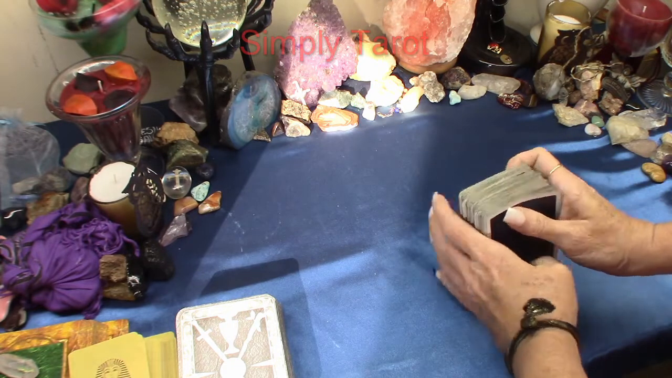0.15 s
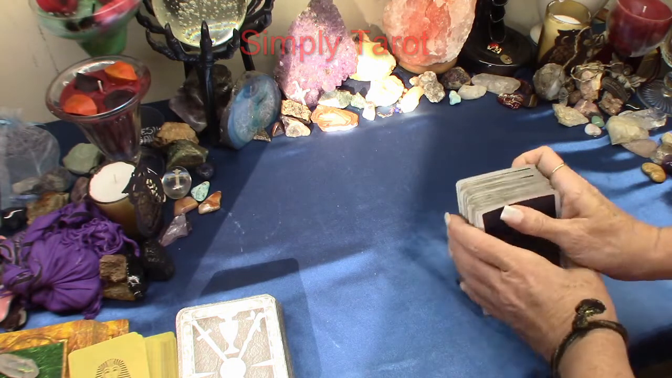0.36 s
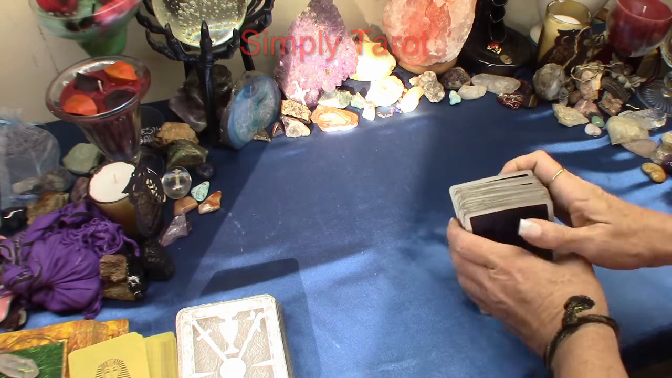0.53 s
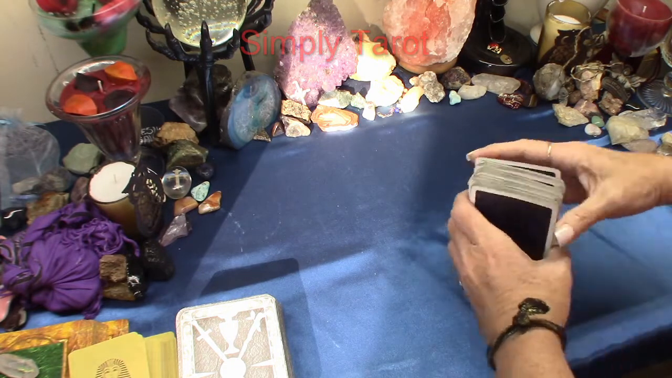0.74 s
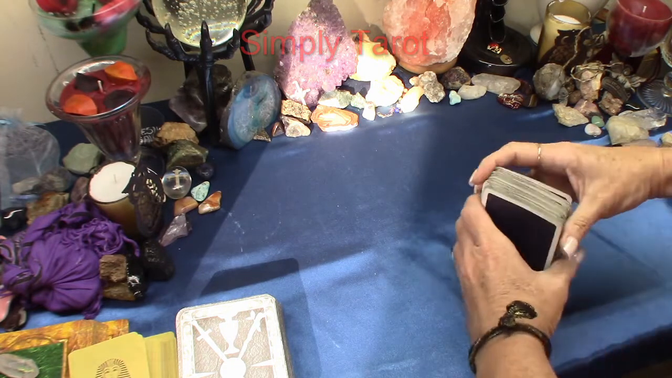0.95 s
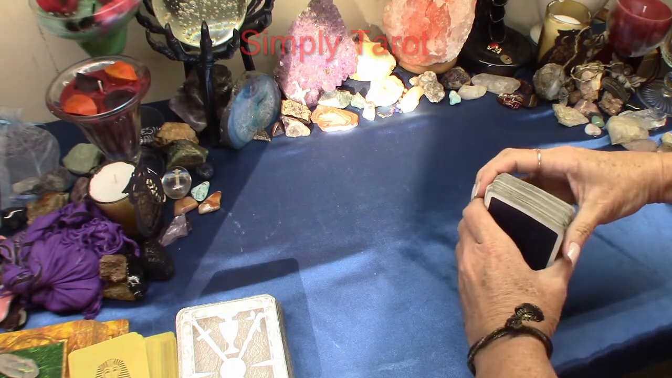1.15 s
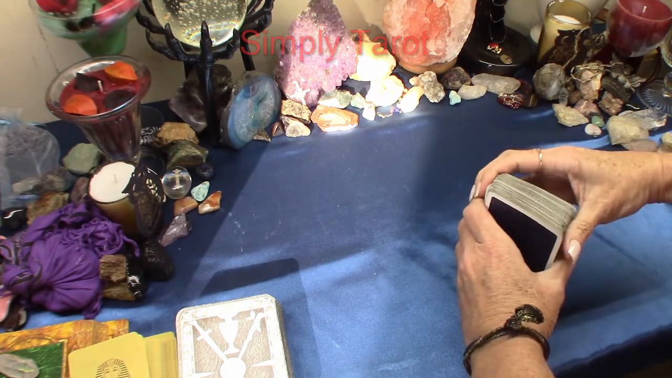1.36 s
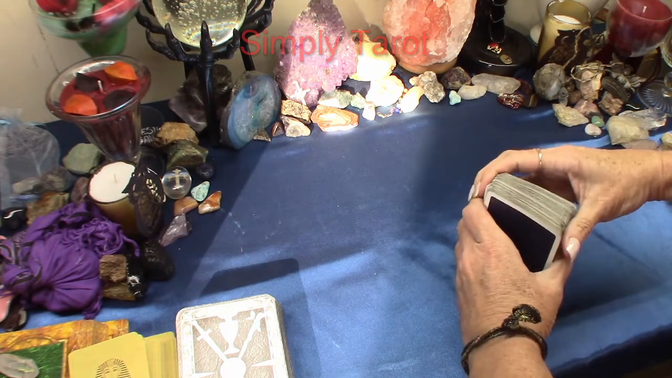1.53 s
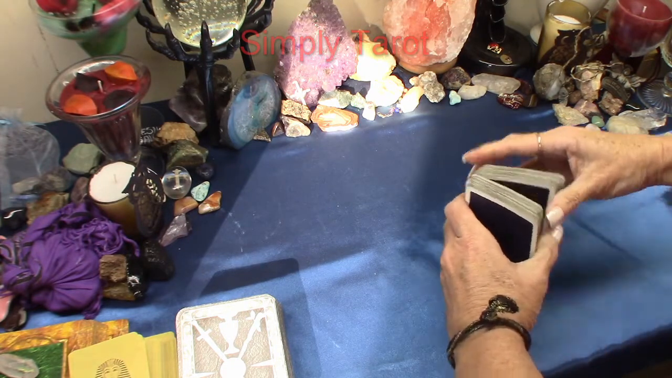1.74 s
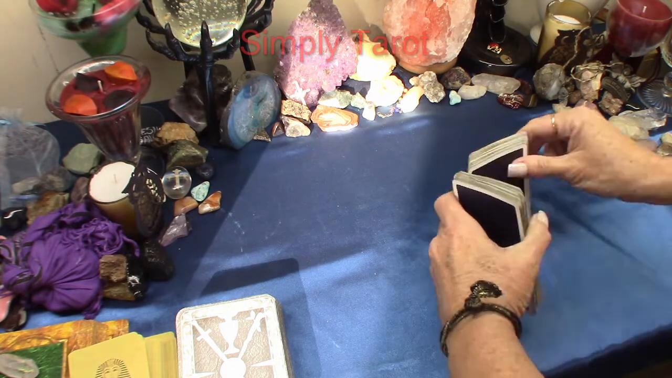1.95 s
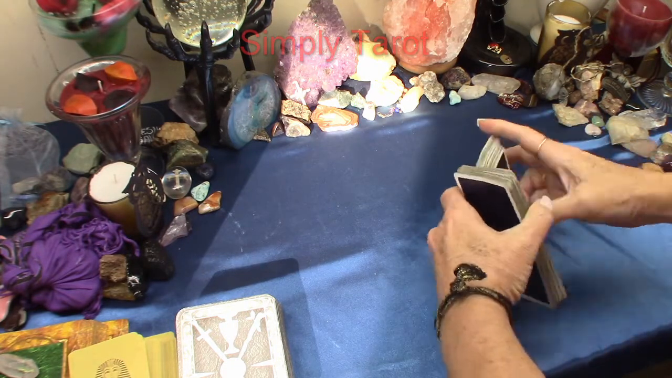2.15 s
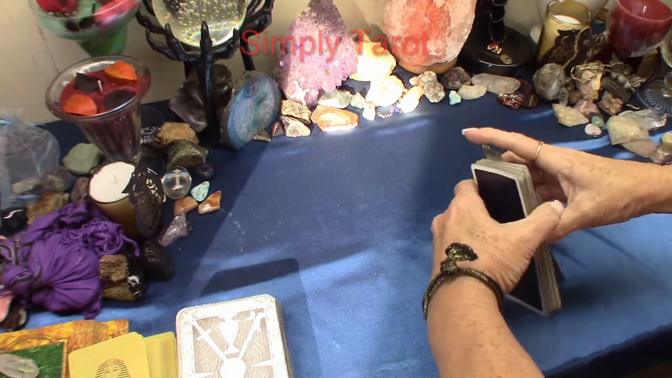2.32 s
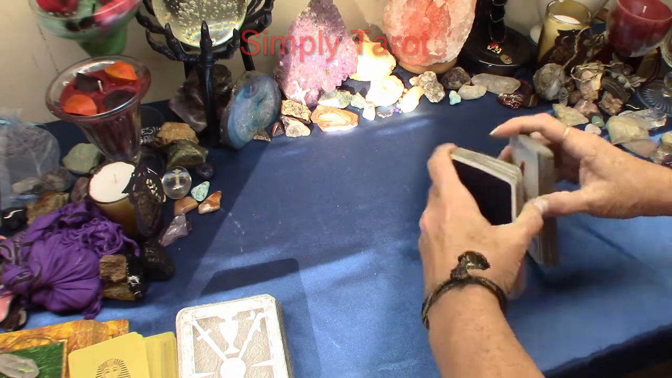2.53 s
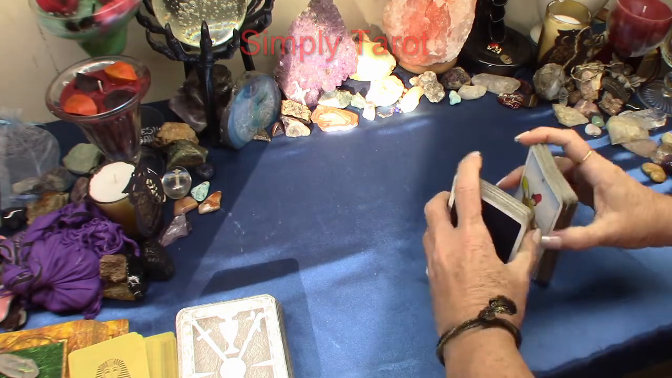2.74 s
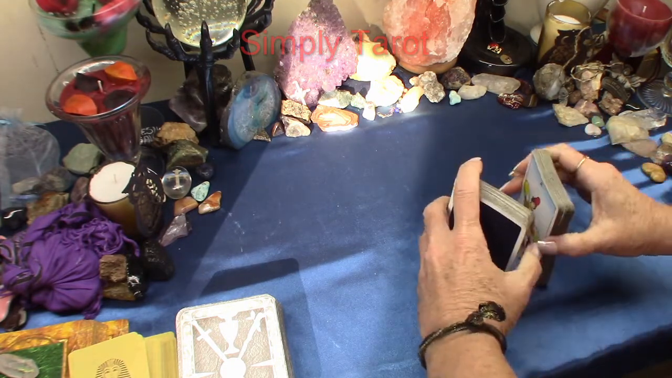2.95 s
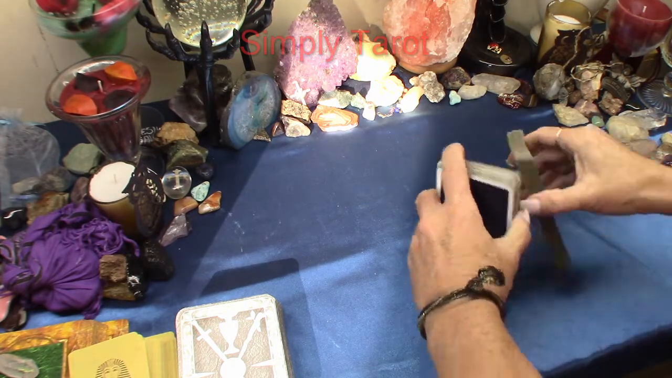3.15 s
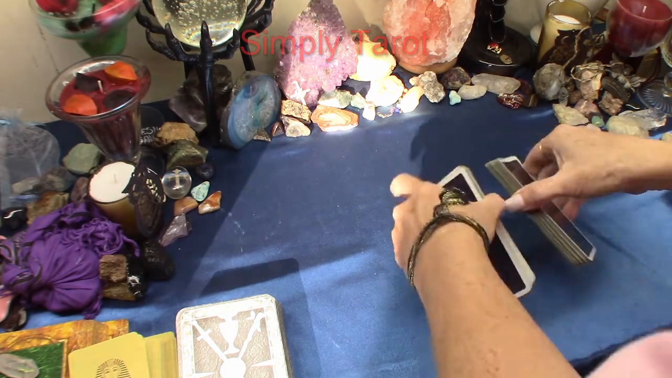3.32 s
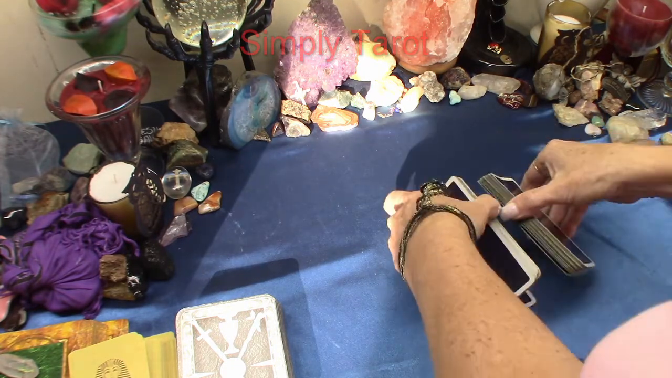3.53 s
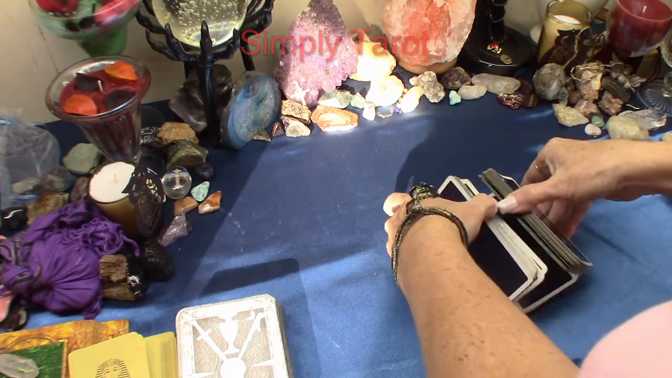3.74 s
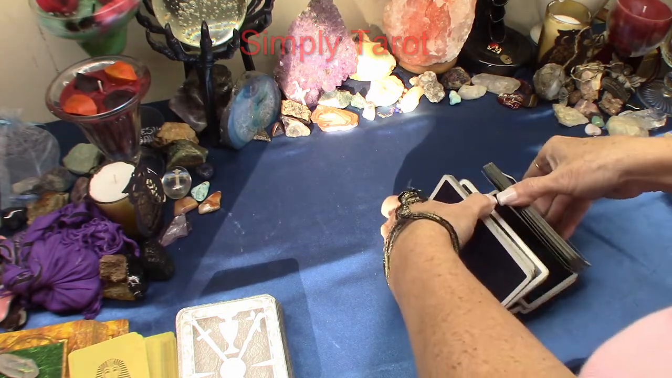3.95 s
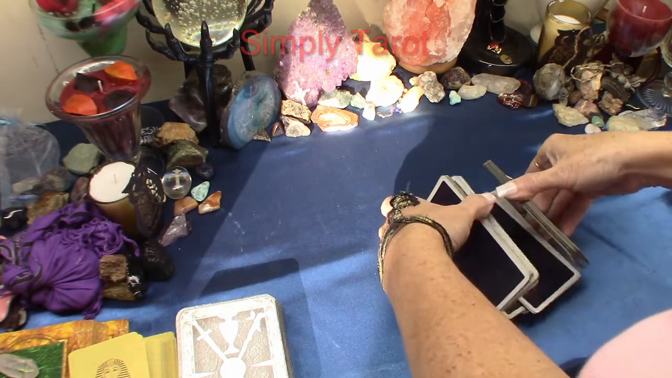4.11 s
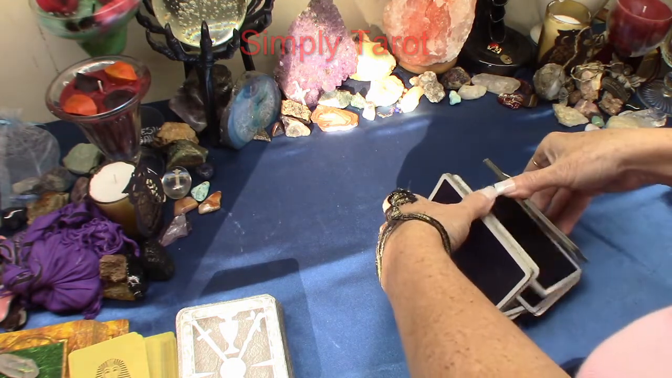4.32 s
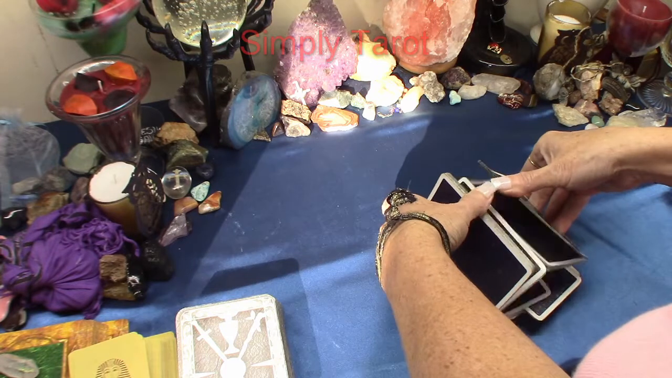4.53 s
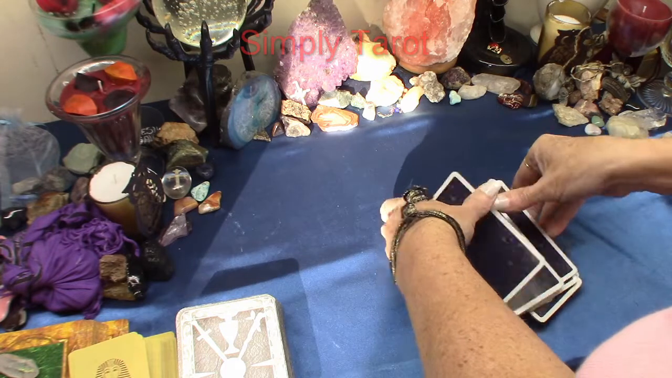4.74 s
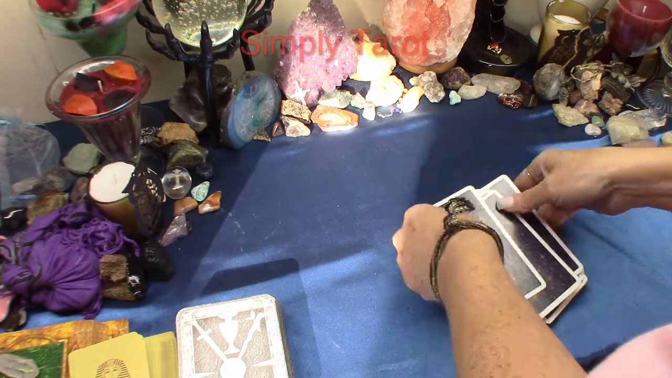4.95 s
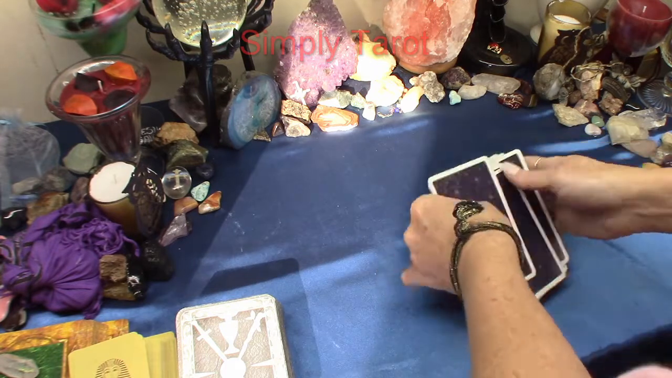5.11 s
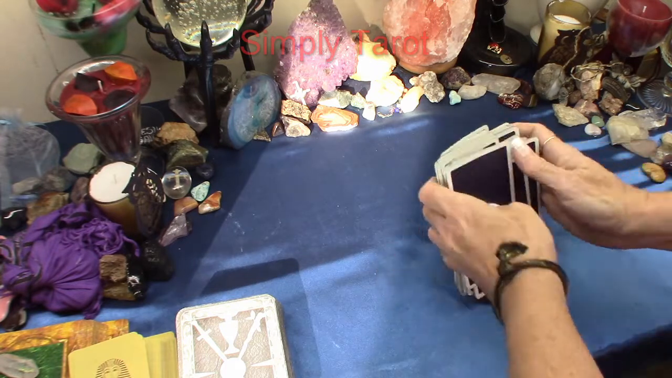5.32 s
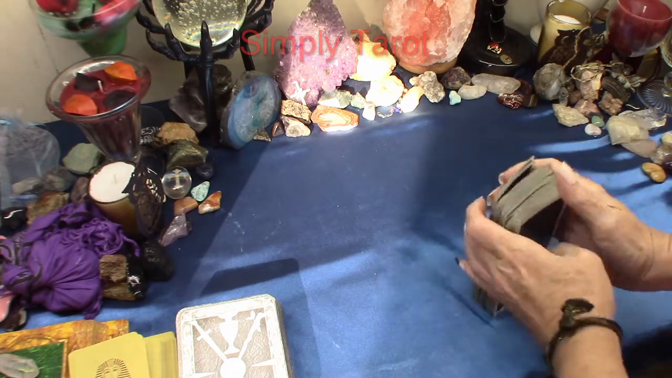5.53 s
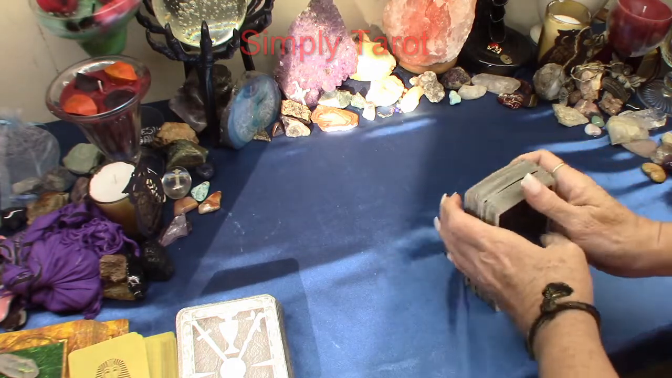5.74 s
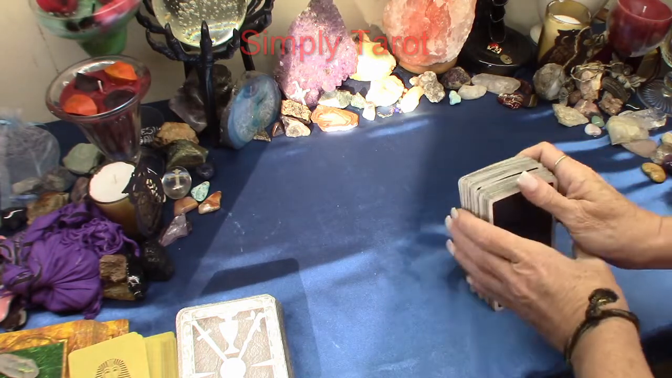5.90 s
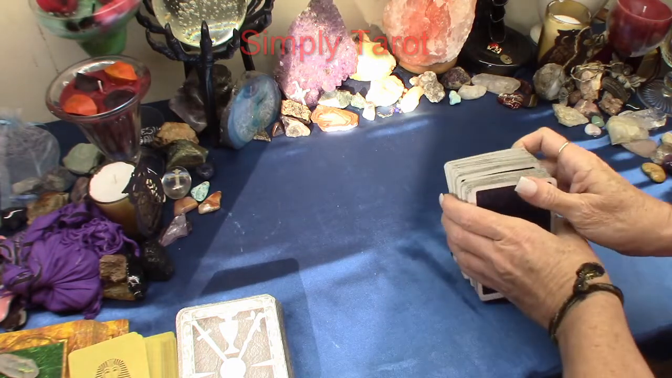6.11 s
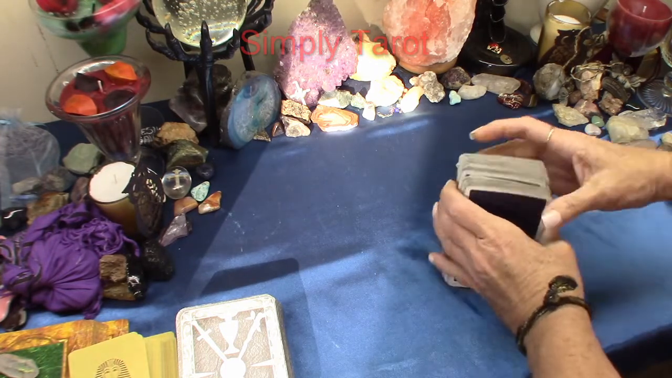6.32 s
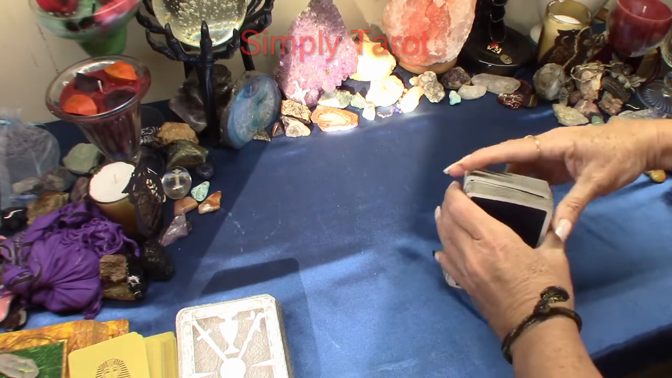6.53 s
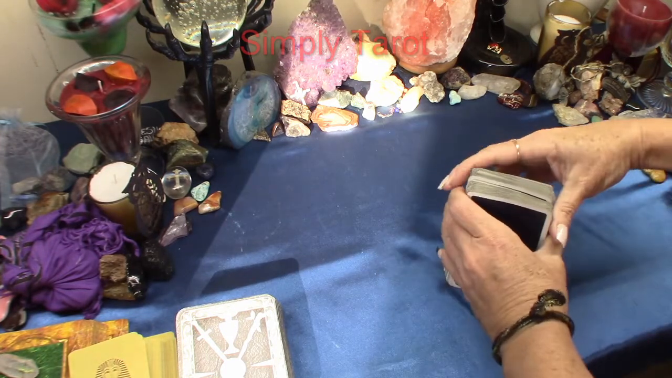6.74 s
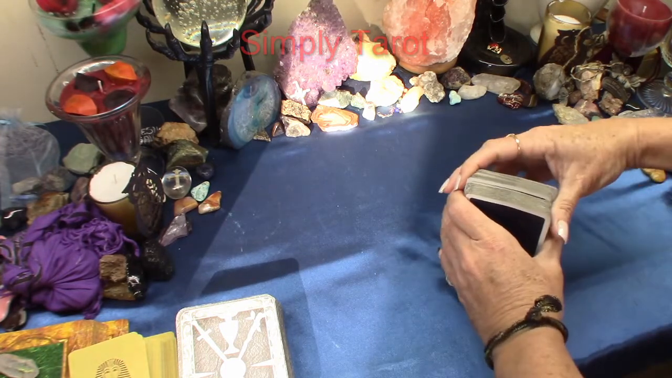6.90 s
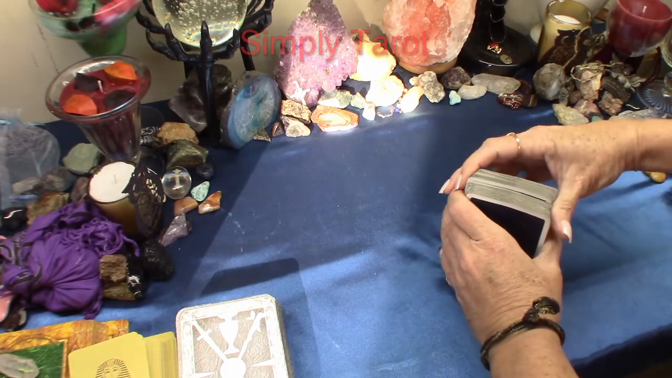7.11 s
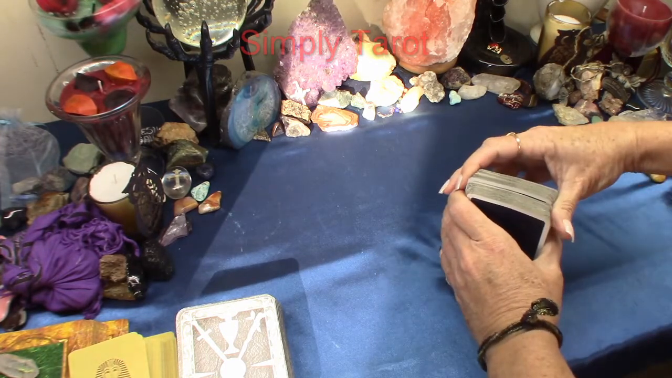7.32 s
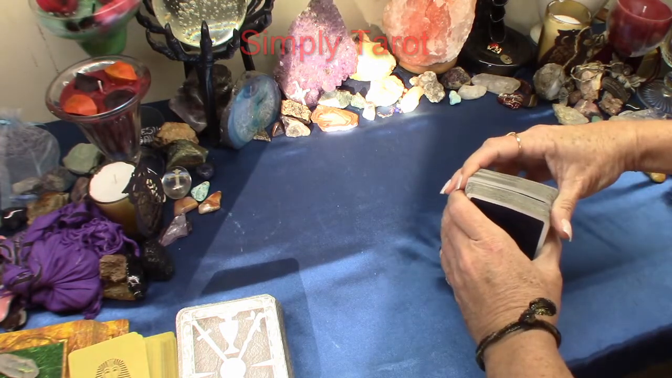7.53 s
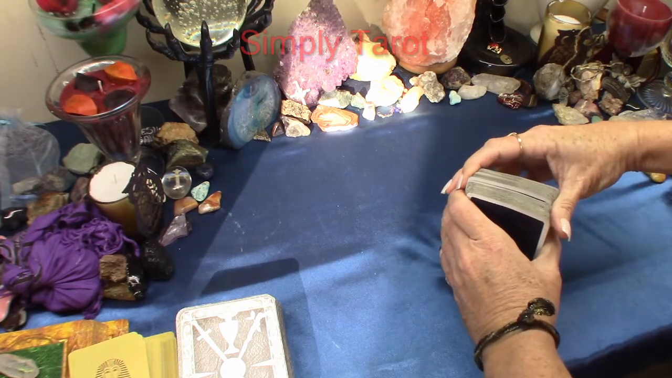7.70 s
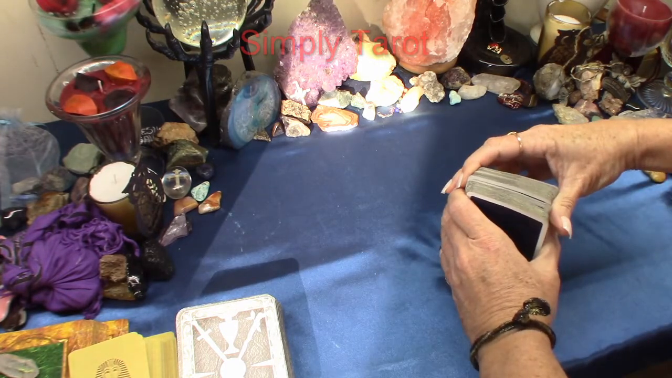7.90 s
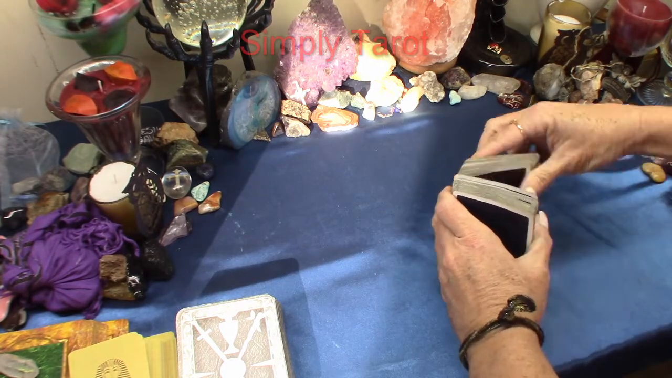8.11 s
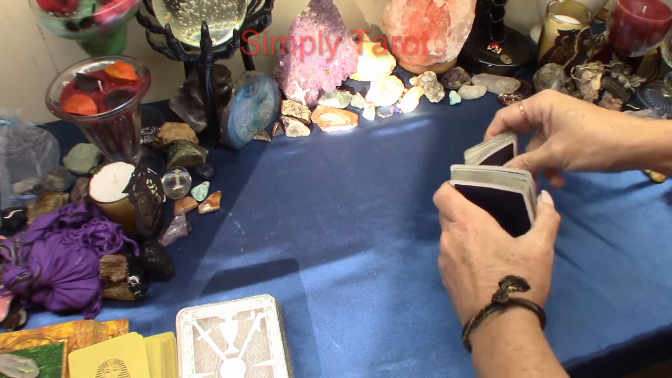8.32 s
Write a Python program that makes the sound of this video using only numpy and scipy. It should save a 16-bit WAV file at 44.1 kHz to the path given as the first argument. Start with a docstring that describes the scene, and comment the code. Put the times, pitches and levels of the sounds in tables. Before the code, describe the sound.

A small, quiet room with short echoes, heard close to the hands. Soft air noise, a low steady appliance hum and very faint whines, one high and throbbing, run throughout. At 0-0.7 seconds stiff cards slide with brief hisses and two soft snaps; a light bump follows at 0.9. After a lull, small clicks cluster at 1.7-2.3. At about 2.7-2.8 the deck strikes the cloth-covered table in a heavy, dull double knock with woody clatter. A sharp snap at 3.6 opens the riffle: dense, dry crackling, strongest near 3.6-3.9, flurrying again at 4.3-5.0, then fading into papery ticks by 5.3. Around 5.4-5.8 the pack is squared with thuds, snaps and swishes. Another slide comes near 6.1, then a hard, bright clack on the table at 6.4. Mostly background remains until a faint slide and soft snap around 8.2.

```python
"""Sliding cards hiss, then snap: a deck of large cards is cut, riffled and squared by hand in a small quiet room.
Each snap is a short burst of noise ringing the pile, the smacking face, the card and its edge.
The deck knocks dully on a cloth-covered table: a boom of squeezed air and a clatter of table-top modes.
Strokes are swelling band-passed noise; decaying noise gives the echoes of the room.
Behind lie shaped room noise, the hum of an appliance and thin whines, one of which throbs."""
import sys
import numpy as np
from scipy import signal
from scipy.fft import rfft, irfft, next_fast_len
from scipy.io import wavfile

SR = 44100
rng = np.random.default_rng(int(sys.argv[2]) if len(sys.argv) > 2 else 0)


def store_pcm(level_fs):
    """Save levels as 16-bit WAV."""
    pcm = np.round(np.clip(level_fs, -1, 1) * 32767).astype(np.int16)
    wavfile.write(sys.argv[1], SR, np.atleast_2d(pcm).T)


N = 373086

SOFT_DB = -45   # level of a soft snap or landing; harder ones rasp more or are brighter

# Cards snapping; part levels are re the snap level. Columns: t/s, snap level/dB, pile f/Hz, pile level/dB,
# smack f/Hz, smack level/dB, ring f/Hz, ring level/dB, edge level/dB
CARD_SNAPS = [(0.484, -47, 360, -10, 1180, -16, 2680, -25, -9),
              (0.662, -44.5, 364, -16, 1130, -12, 3060, -12, -23),
              (1.711, -54, 353, -16, 980, -21, 2580, -18, -19),
              (1.763, -56, 355, -21, 899, -18, 3360, -19, -10),
              (1.857, -42, 676, -15, 980, -16, 3400, -14, -21),
              (1.875, -40.5, 355, -18, 1250, -11.5, 5010, -13.5, -19),
              (1.92, -42.5, 343, -16, 1230, -19, 5170, -16, -17),
              (2.095, -48.5, 361, -27, 840, -11.5, 2400, -19, -19),
              (2.219, -55.5, 360, -6, 1100, -4.5, 5630, -12, -26),
              (2.253, -44.5, 465, -12.5, 1310, -12, 3380, -11.5, -21),
              (2.546, -55.5, 366, -9, 880, -21, 4240, -11, -17),
              (2.808, -40.5, 734, -3, 910, -29, 5100, -20.5, -25),
              (2.958, -51.5, 367, -13, 1050, -20, 3130, -16, -17),
              (3.307, -58, 361, -8, 972, -14, 5570, -18, -16),
              (3.349, -55, 358, -11, 888, -19, 2800, -14, -17),
              (3.62, -45, 556, 5, 1060, -35, 3320, -7.5, -41),
              (3.626, -27, 384, -11.5, 1190, -9.5, 3650, -19, -30),
              (3.752, -39.5, 685, -4, 840, 0.5, 4070, -26, -20),
              (3.756, -33, 467, -6.5, 1800, -14, 4380, -14, -23),
              (3.765, -32.5, 383, -7.5, 1740, -6.5, 3300, -9.5, -30),
              (3.891, -36, 570, -11, 1340, -8, 3030, -8, -25),
              (3.897, -30.5, 610, -12.5, 2030, -10.5, 3250, -11.5, -19),
              (3.903, -33, 550, -9.5, 966, -10.5, 2300, -23, -31),
              (3.921, -36, 580, -8.5, 1240, -11, 3600, -14, -24),
              (3.926, -34, 610, -13, 1120, -9, 2820, -37, -18),
              (3.931, -31.5, 365, -9, 1650, -9.5, 2660, -11, -50),
              (4.086, -36, 400, -8.5, 1160, -7, 2760, -14.5, -32),
              (4.167, -37, 440, -8, 955, -11, 5040, -21, -25),
              (4.291, -35, 402, -10, 1470, -15, 3260, -12.5, -8),
              (4.298, -44.5, 360, -1, 1570, -4.5, 2580, -7.5, -31),
              (4.366, -40, 326, -9, 1030, -12.5, 5200, -12, -19),
              (4.371, -38, 378, -12.5, 1620, -14.5, 3330, -14, -22),
              (4.426, -44.5, 379, -6, 1080, -10, 3280, -17, -21),
              (4.465, -41, 736, -21, 1090, -9.5, 2860, -11, -38),
              (4.476, -48, 318, -30, 1630, -6, 2980, -10, -22),
              (4.485, -45, 680, -19, 1680, -13, 4700, -13, -24),
              (4.492, -46, 374, -7, 1530, -10, 2620, -26, -16),
              (4.605, -41, 726, -5.5, 1150, -1.5, 3040, -10, -32),
              (4.611, -38.5, 387, -11.5, 1100, -2, 2920, -12, -36),
              (4.616, -37.5, 337, -11, 1140, -12, 2820, -23, -33),
              (4.624, -42, 356, -11, 1610, -6, 2730, -22, -20),
              (4.647, -40, 361, -34, 1650, -6.5, 2440, -27, -17),
              (4.668, -37, 457, -17, 1150, -10, 3040, -24, -22),
              (4.681, -38, 418, -8, 1560, -12, 3070, -13, -30),
              (4.691, -43, 322, -12, 1240, -5.5, 3240, -17, -19),
              (4.706, -36.5, 358, -18, 1570, -11, 3220, -16, -21),
              (4.732, -36, 373, -9.5, 1960, -9.5, 3100, -11.5, -22),
              (4.748, -32, 318, -5.5, 1430, -18, 5450, -29, -10.5),
              (4.752, -36.5, 500, -3.5, 1200, -1, 4960, -9.5, -31),
              (4.838, -39, 368, -8, 2050, -6.5, 3460, -10.5, -26),
              (4.901, -51, 358, -17, 1130, -8, 3050, -5.5, -40),
              (4.939, -39.5, 370, -18, 1100, -9.5, 3200, -11, -16.5),
              (4.961, -40, 684, -11, 1170, -10, 2740, -16.5, -36),
              (4.972, -44.5, 358, -14, 980, -7.5, 3480, -15, -19),
              (5.072, -49.5, 358, -21, 1550, -7.5, 4550, -12, -31),
              (5.087, -51, 358, -23, 1090, -5, 3330, -9, -28),
              (5.153, -53.5, 339, -22, 1040, -5, 3400, -6.5, -38),
              (5.177, -54, 355, -10, 1540, -2, 3140, -20, -32),
              (5.259, -55, 320, -21, 1700, -7, 3100, -5, -27),
              (5.271, -47, 320, -18, 1040, -10, 2600, -8.5, -32),
              (5.276, -51, 314, -25, 1250, -9, 4750, -16, -27),
              (5.285, -52, 323, -23, 1110, -14, 2590, -8, -21),
              (5.298, -55, 361, -22, 1640, -18, 3190, -6, -31),
              (5.411, -44, 358, -26, 853, -18, 2940, -16, -18),
              (5.579, -44.5, 640, -12, 1910, -6, 3100, -11, -36),
              (5.631, -38.5, 636, -4.5, 1070, -24, 4640, -18.5, -32),
              (5.778, -43.5, 353, -6, 937, -21, 2600, -24, -25),
              (5.807, -47.5, 377, -24, 1140, -26, 5100, -5.5, -23),
              (6.064, -48.5, 370, -10, 1260, -8, 5000, -16, -13),
              (6.466, -35, 660, -2, 1010, -26, 2530, -31, -35),
              (8.243, -40, 353, -23, 1460, -11, 3960, -11.5, -19.5)]
CRACKLE_S, CRACKLE_SPREAD_OCTAVES = 0.002, 0.4   # median decay constant and its spread
PILE_WIDTH_HZ, SMACK_WIDTH_HZ, RING_WIDTH_RATIO = 125, 340, 0.19   # ring width as a share of its pitch
PAPER_DB, PAPER_DB_PER_DB = -4, 0.25   # broad rasp re the ringing in a soft snap; growth with snap level
PAPER_ROOM_DB = 7   # the rasp spreads every way, so the room hears more of it than of the ringing
SNAP_LEVEL_S = 0.008   # snap levels are rms over this time


def snaps():
    """Impulsive excitation of resonators: a tick and dying crackle ring the pile, smack, card and edge."""
    out = np.zeros((2, N + SR))   # as heard close by, and as sent into the room
    t = np.arange(SR // 20) / SR
    for s, level_db, pile_hz, pile_db, smack_hz, smack_db, ring_hz, ring_db, edge_db in CARD_SNAPS:
        length = CRACKLE_S * 2 ** (CRACKLE_SPREAD_OCTAVES * rng.standard_normal())
        shape = (1 - np.exp(-t / 0.00054)) * np.exp(-t / length)
        bursts = rng.standard_normal((2, len(t))) * (0.5 + rng.exponential(1.0, len(t))) * shape
        bursts[:, SR // 3000] += [5, 2.5]   # the edge lets go
        rasp, flex = (colourless(burst, length) for burst in bursts)
        parts = [(pile_hz, PILE_WIDTH_HZ, pile_db, [240, 750]),
                 (smack_hz, SMACK_WIDTH_HZ, smack_db, [750, 2600]),
                 (ring_hz, RING_WIDTH_RATIO * ring_hz, ring_db, [2100, 6000])]
        paper_db = PAPER_DB + PAPER_DB_PER_DB * (level_db - SOFT_DB)
        paper_gains = from_db(paper_db + np.array([0, PAPER_ROOM_DB]))
        snap = np.zeros((2, len(t)))
        for hz, width_hz, db, band_hz in parts:
            ringing = narrow(flex, hz, width_hz)
            paper = evened(butter(rasp, band_hz, "band"))
            mixes = [evened(ringing + gain * paper) for gain in paper_gains]
            snap += from_db(db) * np.array(mixes)
        bright = butter(butter(rasp, 4700, "high"), 21000, "low", order=1)
        edge = from_db(edge_db) * evened(bright)
        level = from_db(level_db) * np.sqrt(SNAP_LEVEL_S * SR)
        out[:, round(s * SR):][:, :len(t)] += level * (snap - edge)
    return out[:, :N]


# Resonant modes of the table top. Columns: f/Hz, width/Hz, level/dB
TABLE_MODES = [(161, 26, 18), (277.4, 11, 14.5), (341, 12, 11.5), (411, 52, 14.5), (527, 22, 6),
               (585, 11, 7.5), (667, 11, 13), (718, 35, 9.5), (807, 50, 8), (895, 49, 2), (972, 85, 6.5),
               (1109, 29, 8), (1185, 35, 4), (1353, 66, 6.5), (1448, 42, 6.5), (1834, 34, 5.5),
               (2060, 35, -4), (2630, 110, -16), (2740, 80, -8), (3120, 190, -3)]
# Deck knocking on the table. Columns: t/s, boom peak level/dB, boom f/Hz, boom rise/s,
# clatter peak level/dB, f/Hz of the best-rung region, landing rise/s
DECK_KNOCKS = [(0.91, -30.5, 240, 0.0037, -36.5, 750, 0.0022),
               (0.939, -37.5, 277, 0.0029, -52, 650, 0.0044), (1.872, -69, 347, 0.02, -45, 855, 0.0039),
               (2.7197, -15.5, 352, 0.0087, -23, 1100, 0.006), (2.733, -37, 354, 0.006, -33.5, 744, 0.0042),
               (2.771, -19.5, 208, 0.0026, -22, 850, 0.0019), (2.812, -52, 302, 0.0024, -38, 850, 0.0044),
               (2.839, -32, 243, 0.0018, -36.5, 650, 0.0035), (4.871, -48, 351, 0.0094, -44.5, 400, 0.0031),
               (5.119, -50.5, 348, 0.0058, -64, 400, 0.0033), (5.462, -48, 258, 0.0044, -43.5, 402, 0.0027),
               (5.478, -38, 362, 0.018, -25.5, 544, 0.0041), (5.498, -34, 326, 0.0045, -42, 480, 0.0037),
               (5.577, -24, 280, 0.00085, -24, 634, 0.0022),
               (6.414, -23, 274.8, 0.012, -13.5, 1390, 0.0057)]
SPOT_DB = 3   # where the deck lands favours one region of modes: loss an octave away
SOFT_TOP_HZ, DB_PER_OCTAVE = 726, 24.5   # clatter cutoff of a soft landing; level rise that doubles it


def knocks():
    """Air-cushion and modal radiation: squeezed air booms; card edges landing in turn ring the table top."""
    boom, rattle = np.zeros((2, N + SR))
    t = np.arange(SR // 3) / SR
    for s, boom_db, boom_hz, rise, clatter_db, spot_hz, landing_s in DECK_KNOCKS:
        swell = (t / rise * np.exp(1 - t / rise)) ** 2
        landing_swell = (t / landing_s * np.exp(1 - t / landing_s)) ** 0.81
        landing = colourless(rng.standard_normal(len(t)) * landing_swell, 2 * landing_s)
        rung = np.zeros(len(t))
        for k, (hz, width_hz, db) in enumerate(TABLE_MODES):
            spot_loss_db = SPOT_DB * min(np.log2(hz / spot_hz) ** 2, 3)
            sign = (-1) ** k   # neighbouring modes have opposite signs
            rung += sign * from_db(db - spot_loss_db) * evened(resonate(landing, hz, width_hz))
        contact = 4.5 * evened(butter(landing, 4300, "low"))
        top_hz = SOFT_TOP_HZ * 2 ** ((clatter_db - SOFT_DB) / DB_PER_OCTAVE)
        clatter = butter(rung + contact, top_hz, "low", order=3)   # the cloth dulls the contact
        start = round(s * SR)
        boom[start:][:len(t)] += from_db(boom_db) * swell * np.sin(2 * np.pi * boom_hz * t)
        rattle[start:][:len(t)] += from_db(clatter_db) * peak_one(clatter)
    return boom[:N], rattle[:N]


# Cards sliding over each other. Columns: middle t/s, half length/s, hiss level/dB,
# body level/dB re hiss, body centre/octaves above 1 kHz
CARD_STROKES = [(.0, 0.03, -54, -0.7, 1.15), (0.176, 0.078, -70, -4, 0.9), (0.233, 0.025, -60.5, 6, 0.71),
                (0.39, 0.069, -68.5, -12, 0.8), (0.476, 0.031, -56, -0.5, 0.38),
                (0.906, 0.048, -68, -12, 0.9), (1.01, 0.019, -68.5, -5, 0.65),
                (1.916, 0.04, -73, 8.5, 0.65), (2.23, 0.064, -69.5, 5, 0.4), (2.469, 0.017, -72, 4, 0.8),
                (2.57, 0.046, -70, -6, 0.87), (2.753, 0.044, -69, -11, 0.8), (4.67, 0.075, -64, 7, 0.53),
                (5.05, 0.024, -65, 4.5, 0.3), (5.246, 0.12, -64.5, 2.5, 0.48),
                (5.485, 0.085, -62, -0.8, 0.86), (5.612, 0.073, -61, 1, 0.53),
                (5.719, 0.045, -64.5, -1.5, 0.86), (5.795, 0.042, -58.5, -1.3, 0.69),
                (5.994, 0.089, -72, -4, 0.8), (6.081, 0.045, -57.5, -6.8, 0.44),
                (6.424, 0.021, -57.5, -5, 1.4), (8.1, 0.07, -74.5, 0.4, 0.8),
                (8.265, 0.21, -69, -0.5, 1.04)]
CARD_MODES_HZ, MODE_PATCHY_DB = (860, 3500), 2.5   # range of card ringing and its random level spread
STROKE_EDGE_DB, BODY_FALL_DB = 0.5, 5.5   # edge re hiss; loss of the body an octave off its centre


def slide():
    """Stick-slip friction: catching paper fibres make grainy noise that rings the card in each stroke."""
    t = np.arange(N) / SR
    catches = (rng.random(N) < 700 / SR) * rng.exponential(1, N)   # about 700 stronger grains a second
    grains = rng.standard_normal(N) * (1 + 1.5 * catches)
    grains = grains * from_db(2.2 * drift(60))
    hiss = rms_one(butter(grains, [2400, 9100], "band"))
    edge = rms_one(butter(grains, [6500, 18700], "band"))
    modes_hz = np.geomspace(*CARD_MODES_HZ, num=8)
    modes = []
    for hz in modes_hz:
        patchy = grains * from_db(MODE_PATCHY_DB * drift(25))
        modes.append(rms_one(resonate(patchy, hz, 0.15 * hz)))
    modes = np.array(modes)
    out = np.zeros(N)
    for middle, half, db, body_db, centre in CARD_STROKES:
        span = slice(max(int((middle - half) * SR), 0), int((middle + half) * SR))
        octaves_off = np.log2(modes_hz / 1000) - centre
        share = evened(from_db(-BODY_FALL_DB * octaves_off ** 2))
        body = from_db(body_db) * share @ modes[:, span]
        sound = hiss[span] + from_db(STROKE_EDGE_DB) * edge[span] + body
        swell = np.cos(np.pi / 2 * np.clip((t[span] - middle) / half, -1, 1))
        out[span] += from_db(db) * swell * sound
    return out


# Reverberation time of the room. Columns: f/Hz, time to fall by 60 dB/s
ROOM_DECAY = [(125, 0.23), (500, 0.26), (2000, 0.4), (6000, 0.25), (14000, 0.14)]
FIRST_ECHO_S = 0.0017   # time scale on which the echoes build up


def room(x):
    """Diffuse reverberation: two independent noises stand for dense echoes, each octave decaying at its rate."""
    t = np.arange(SR // 2) / SR
    edges_hz = 60 * 2.0 ** np.arange(9)
    echoes = np.zeros((2, len(t)))
    for low, high in zip(edges_hz, edges_hz[1:]):
        decay = from_db(-60 * t / at_hz(ROOM_DECAY, np.sqrt(low * high)))
        echoes += butter(rng.standard_normal((2, len(t))), [low, high], "band") * decay
    echoes = echoes * (1 - np.exp(-(t / FIRST_ECHO_S) ** 2))
    echoes = echoes / np.sqrt(np.sum(echoes[0] ** 2))
    return signal.fftconvolve(x[None], echoes, axes=1)[:, :N]


# Spectrum of the room noise, relative. Columns: f/Hz, level/dB per Hz
AIR_SPECTRUM = [(15, -46), (25, -32), (92, -26), (114, -12), (206, -14.5), (236, -15), (326, -13.5),
                (363, -14.5), (451, -16.5), (531, -16.5), (624, -17.5), (796, -19), (1160, -24),
                (5730, -34), (16000, -44)]
# Difference between the two channels of the room noise. Columns: f/Hz, side level/dB re mid
AIR_WIDTH = [(30, -1), (70, -16), (180, -8.5), (550, -6.5), (1650, -5.5), (4970, -9), (15000, -12.5)]
AIR_DB = -61.5   # rms of the mid signal


def room_noise():
    """Shaped random noise: a common mid and an independent side of opposite sign in the two channels."""
    mid = coloured(rng.standard_normal(N), lambda hz: at_hz(AIR_SPECTRUM, hz))
    side = coloured(rng.standard_normal(N), lambda hz: at_hz(AIR_SPECTRUM, hz) + at_hz(AIR_WIDTH, hz))
    return from_db(AIR_DB) / np.std(mid) * (mid + side * [[1], [-1]])


# Harmonics of the mains hum. Columns: f/Hz, mean rms level/dB
HUM_TONES = [(120.1, -74.5), (240.2, -62.5), (360.3, -63.5)]


def appliance_hum():
    """Harmonic radiation at multiples of the mains: steady tones whose levels waver a little."""
    t = np.arange(N) / SR
    hum = np.zeros(N)
    for hz, db in HUM_TONES:
        tone = np.sqrt(2) * np.sin(2 * np.pi * (hz * t + rng.random()))
        hum += from_db(db + 1.1 * drift(5.7)) * tone
    return hum


# Narrow whines. Columns: f/Hz, width of each of two resonances/Hz, rms level/dB
WHINE_BANDS = [(66, 6, -82), (578, 10, -83), (818, 30, -77), (2250, 60, -87), (3093, 8, -91)]


def whines():
    """Narrow-band filtering: noise passed through sharp resonances is heard as unsteady pitches."""
    noise = rng.standard_normal(N)
    out = np.zeros(N)
    for hz, width_hz, db in WHINE_BANDS:
        band = resonate(resonate(noise, hz, width_hz), hz, width_hz)
        out += from_db(db) * rms_one(band)
    return out


THROB_HZ, THROB_PER_S, THROB_PEAK_S = 5567, 13.34, 7.485   # pitch, mean throb rate, nominal time of a crest
THROB_DB = -78.5   # mean crest level


def throbbing_whine():
    """Amplitude modulation: a thin high tone throbs as a squared cosine with wandering phase and level."""
    t = np.arange(N) / SR
    turn = THROB_PER_S * (t - THROB_PEAK_S) + 0.06 * drift(1.5)
    level = from_db(THROB_DB + 3.4 * drift(5.6))
    return level * np.cos(np.pi * turn) ** 2 * np.sin(2 * np.pi * THROB_HZ * t)


def background():
    """Superposition: room noise, appliance hum and whines add linearly."""
    return room_noise() + appliance_hum() + whines() + throbbing_whine()


def from_db(db):
    """Logarithmic level: decibels to amplitude gain."""
    return 10 ** (np.asarray(db) / 20)


def rms_one(x):
    """Power normalisation: scaled to unit rms."""
    return x / np.sqrt(np.mean(x ** 2) + 1e-20)


def evened(x):
    """Energy normalisation: scaled to unit energy, so every part gets the strength it is given."""
    return x / np.sqrt(np.sum(x ** 2) + 1e-20)


def peak_one(x):
    """Peak normalisation: scaled to a peak of one."""
    return x / (np.abs(x).max() + 1e-20)


def at_hz(points, hz):
    """Logarithmic pitch axis: reads a table by interpolating over log frequency."""
    points = np.array(points)
    return np.interp(np.log(hz), np.log(points[:, 0]), points[:, 1])


def coloured(x, gain_db):
    """Spectral shaping: multiplies the spectrum of x by a gain in dB over frequency."""
    size = next_fast_len(N)
    hz = np.maximum(np.fft.rfftfreq(size, 1 / SR), 1)
    return irfft(rfft(x, size) * from_db(gain_db(hz)), size)[..., :N]


def drift(rate_hz):
    """Low-passed random motion: slow chance with unit rms, computed at every 40th sample."""
    r = np.exp(-80 * np.pi * rate_hz / SR)
    noise = rng.standard_normal(N // 40 + 2002)
    slow = signal.lfilter([1], [1, -2 * r, r * r], noise)[2000:]   # the settling time is dropped
    return np.interp(np.arange(N) / 40, np.arange(len(slow)), rms_one(slow))


def resonate(x, hz, width_hz):
    """Damped resonance: one pole pair with gain near 1 at its top."""
    r = np.exp(-np.pi * width_hz / SR)
    zeros = np.array([1, 0, -1]) * (1 - r * r) / 2
    poles = [1, -2 * r * np.cos(2 * np.pi * hz / SR), r * r]
    return signal.lfilter(zeros, poles, x + 1e-18)


def narrow(x, hz, width_hz):
    """Cascaded resonance: applied twice for steeper skirts, then unit energy."""
    return evened(resonate(resonate(x, hz, width_hz), hz, width_hz))


def butter(x, hz, kind, order=2):
    """Maximally flat filtering: a Butterworth filter."""
    return signal.sosfilt(signal.butter(order, hz, kind, fs=SR, output="sos"), x + 1e-18)


def colourless(burst, length):
    """Spectral whitening: many small contacts have no colour of their own; the burst is kept short."""
    spectrum = rfft(burst)
    size = np.abs(spectrum)
    flat = irfft(spectrum / (size + 0.1 * size.mean()), len(burst))
    return flat * np.exp(-np.arange(len(burst)) / SR / (5 * length))


ROOM_DB, BOOM_ROOM_DB, RATTLE_ROOM_DB = -7, -1.5, -1.5   # all echoes; boom and rattle sent into the room
MIC_LOW_CUT_HZ = 100


def scene():
    """Direct and reverberant fields: hands in the middle; a near-field boom push stirs the room less."""
    boom, rattle = knocks()
    near, spread = snaps()
    sliding = slide()
    direct = near + rattle + sliding + boom
    sent = spread + sliding + from_db(RATTLE_ROOM_DB) * rattle + from_db(BOOM_ROOM_DB) * boom
    alike, unlike = from_db(ROOM_DB) * room(sent)
    # both ports hear the room much alike: only a weak, high-passed part differs
    side = butter(unlike, 1800, "high", order=1) * from_db(-11.0)
    close = direct + alike + side * np.array([[1], [-1]])
    return butter(close, MIC_LOW_CUT_HZ, "high", order=3) + background()


MIC_TOP_HZ, CUTOFF_HZ = 11940, 16300   # start of the droop; everything above the cutoff is 70 dB down


def record(dry):
    """Band limitation: the microphone droops in the top octave, and a steep filter cuts the top."""
    heard = butter(dry, MIC_TOP_HZ, "low")
    return signal.sosfilt(signal.cheby2(12, 70, CUTOFF_HZ, fs=SR, output="sos"), heard)


dry = scene()
out = record(dry)
store_pcm(out)
```